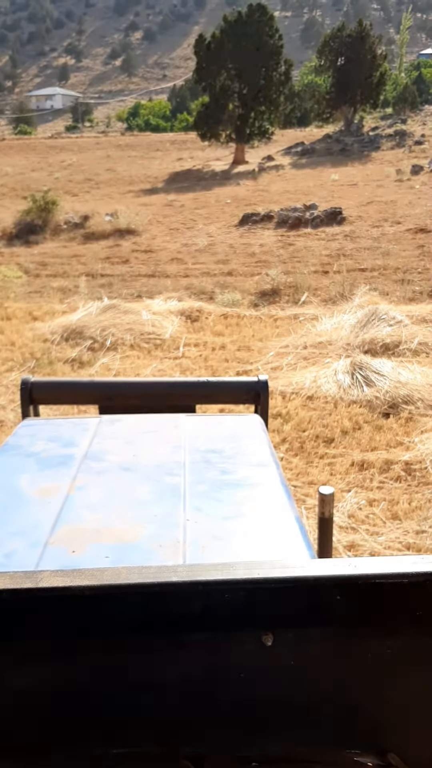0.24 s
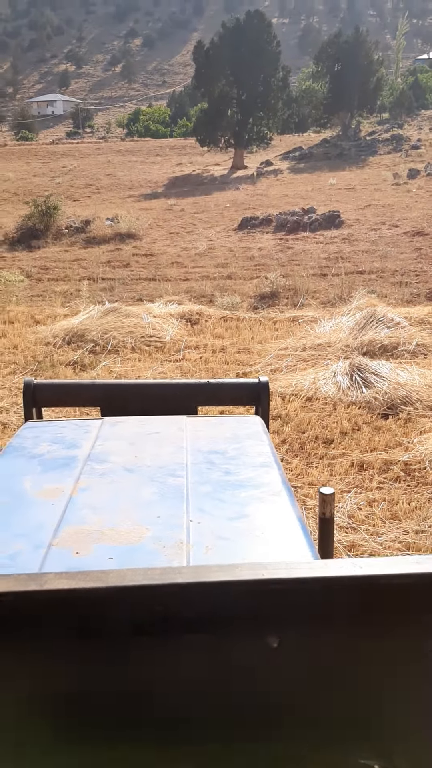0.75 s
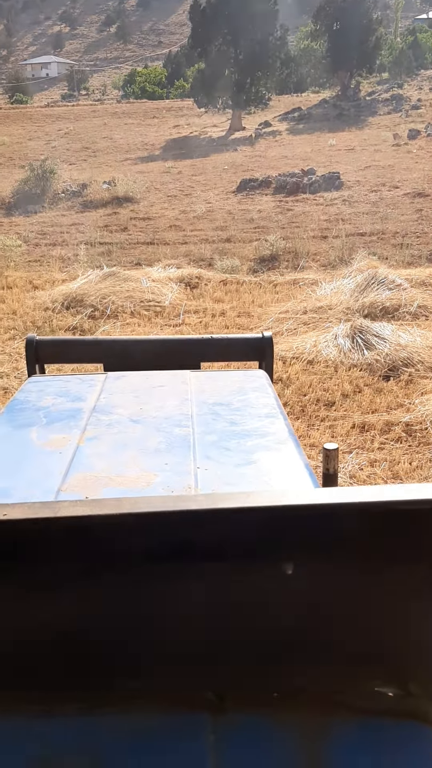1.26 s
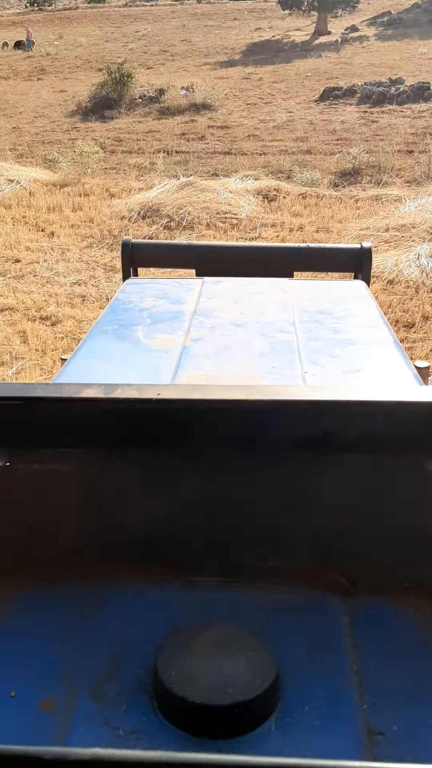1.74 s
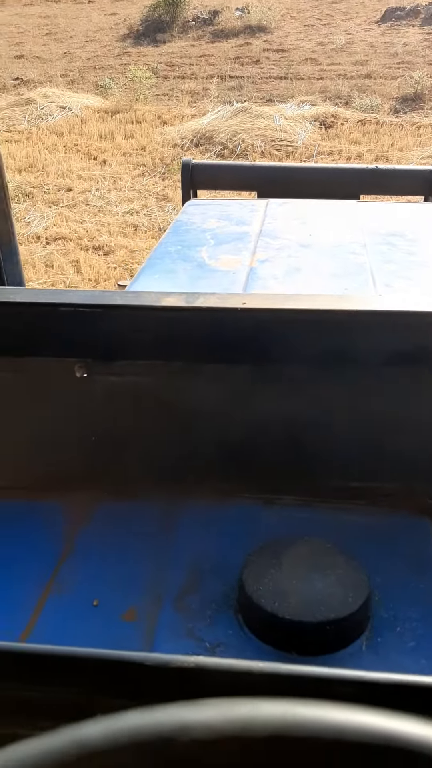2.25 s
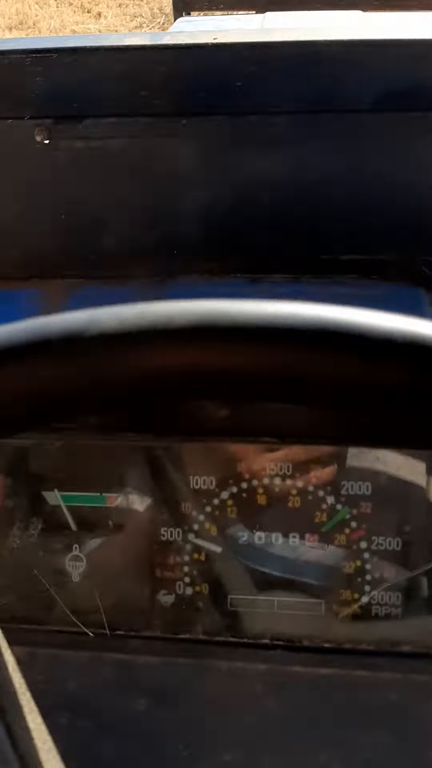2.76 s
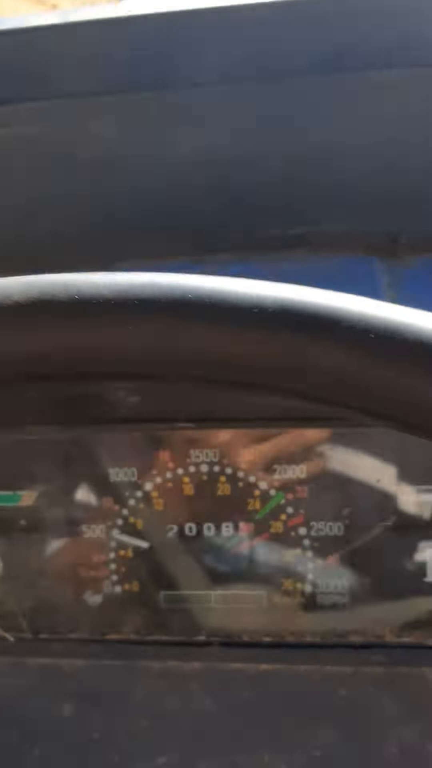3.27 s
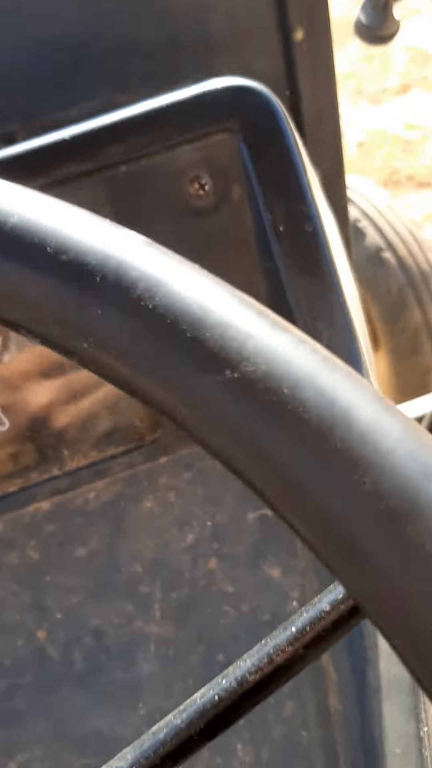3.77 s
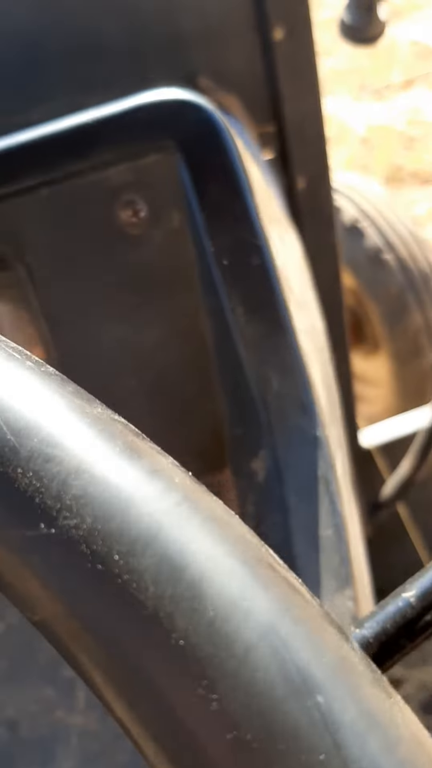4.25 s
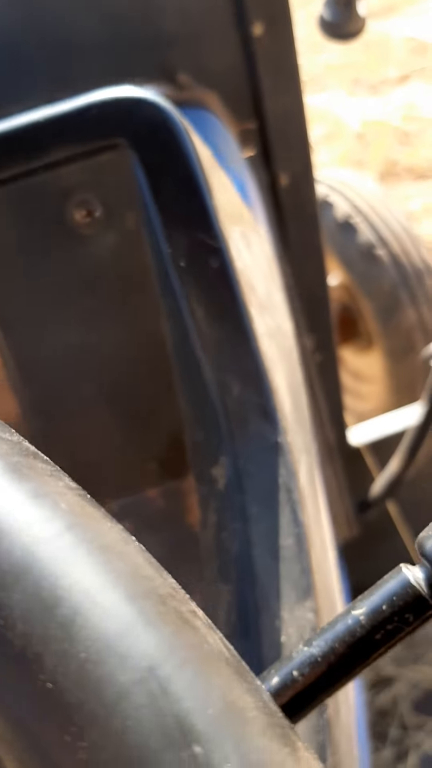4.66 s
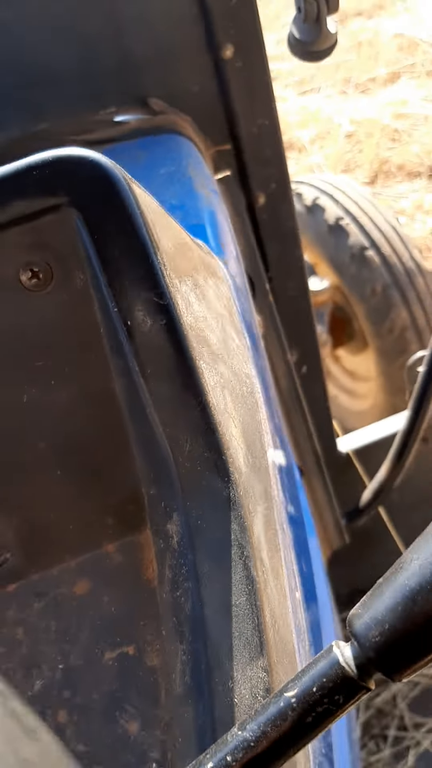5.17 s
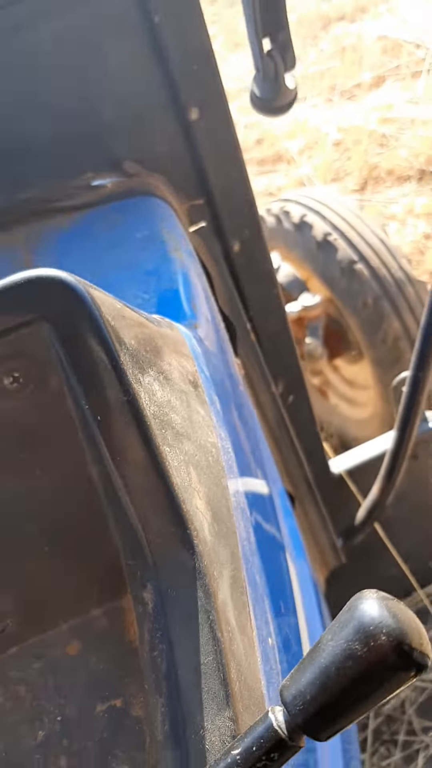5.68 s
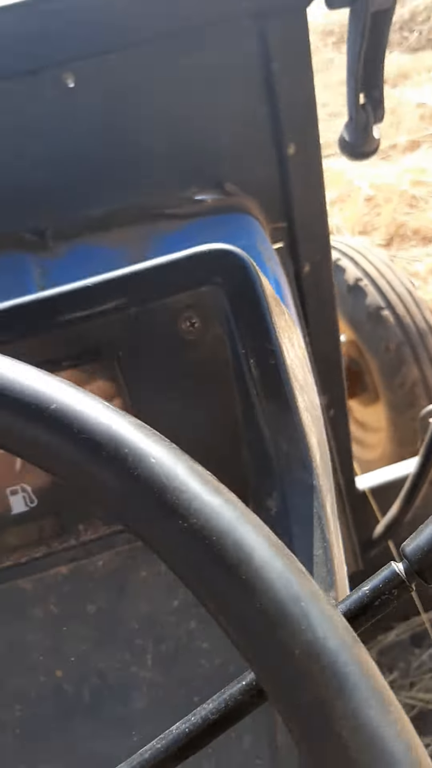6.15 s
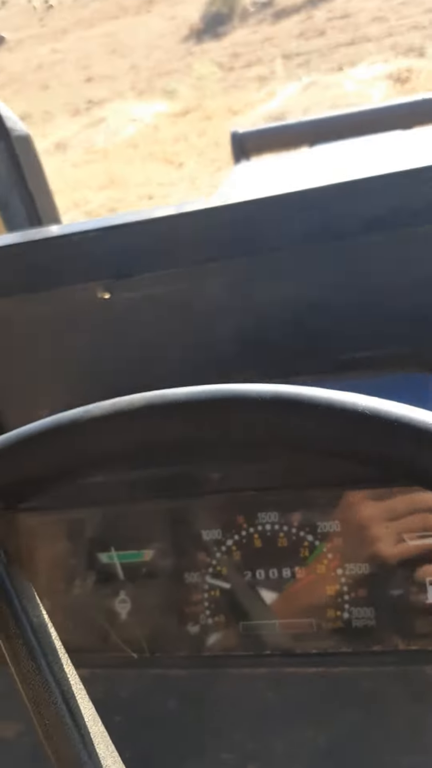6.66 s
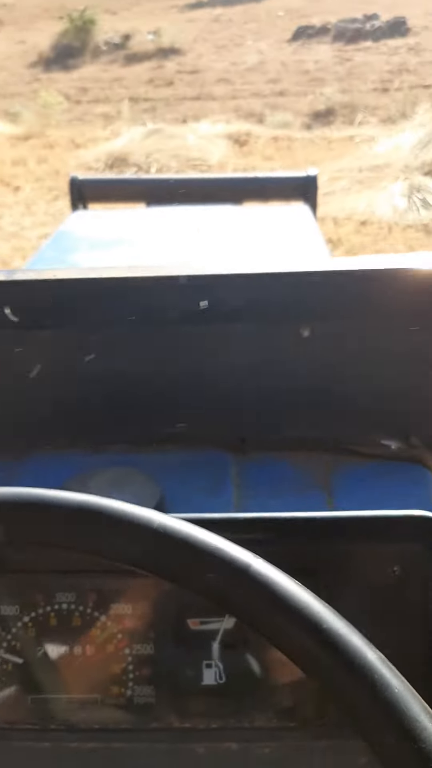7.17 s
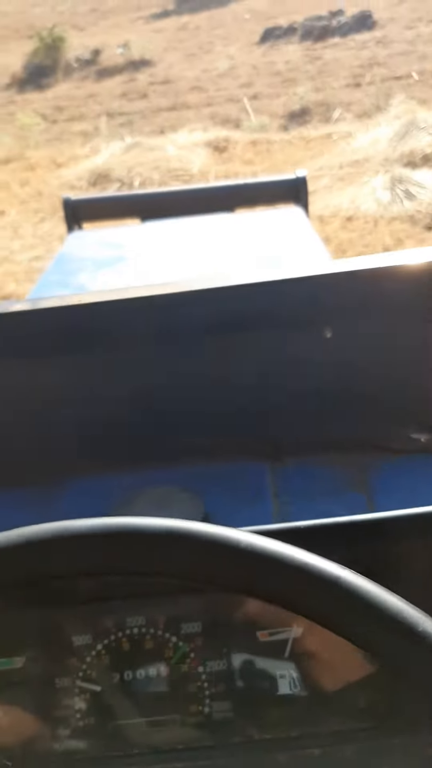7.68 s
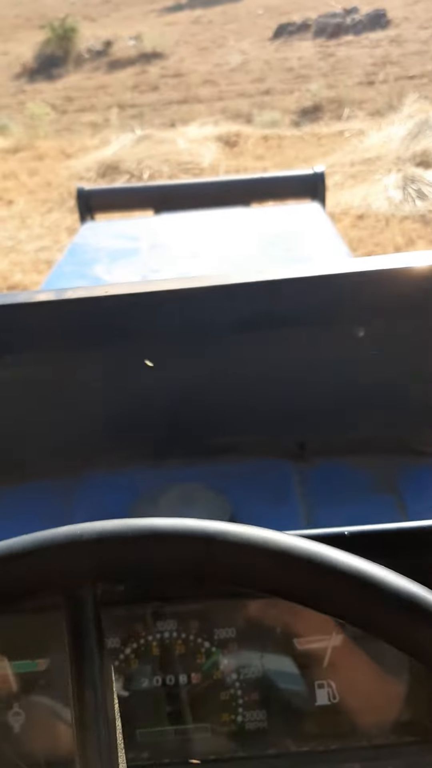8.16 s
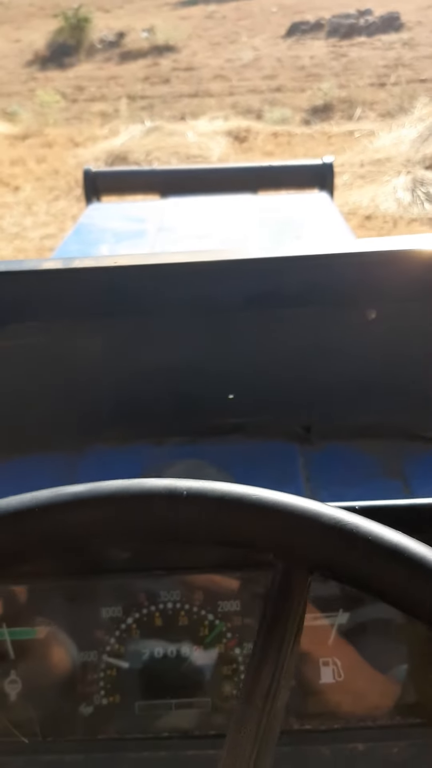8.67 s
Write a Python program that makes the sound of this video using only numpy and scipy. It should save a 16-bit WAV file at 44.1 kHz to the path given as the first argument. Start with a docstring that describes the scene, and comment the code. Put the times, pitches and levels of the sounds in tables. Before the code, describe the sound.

Heard from the seat of a farm tractor in an open field: near quiet with slight handling bumps, a key click, a sharp solenoid clack and a short grinding starter whirr. The diesel fires unevenly, races briefly, then settles to a slow, uneven knock with valve clatter, low exhaust puffs, sheet-metal drone and light wind buffeting a close handheld stereo microphone.

```python
"""A three-cylinder tractor diesel heard from the driver's seat in an open field: the key clicks, the starter
engages and cranks, the engine catches, races briefly and settles to a slow knocking idle. Each firing strikes
the ringing modes of the block; valves clack, loose parts tap and the exhaust pipe puffs. The starter is
throbbing gear noise; clicks are short bright bursts and bumps are ringing panels or low gust thumps. Flickering
noise makes the wind on a pair of microphone ports, the drone of the cab's sheet metal and the hiss."""
import sys
import numpy as np
from scipy import signal
from scipy.fft import rfft, irfft
from scipy.io import wavfile
from scipy.ndimage import uniform_filter1d

SR = 44100
rng = np.random.default_rng(int(sys.argv[2]) if len(sys.argv) > 2 else 0)


def store_pcm(level_fs):
    """Save levels as 16-bit WAV."""
    pcm = np.round(np.clip(level_fs, -1, 1) * 32767).astype(np.int16)
    wavfile.write(sys.argv[1], SR, np.atleast_2d(pcm).T)


N = 393372
T = np.arange(N) / SR  # seconds
HZ = np.fft.rfftfreq(N, 1 / SR)

# ringing modes of block and bonnet: f/Hz, width/Hz, then level/dB when struck by cylinder 1, 2, 3,
# by a valve, and in the steady running
BLOCK_MODES = [(372.5, 16.7, -6, 1.5, 7, 14.5, 9.5), (532, 57, -1, 0.5, -5.5, -1, -26),
               (664, 17.5, 3, 2.5, 0, -14, 8), (792, 6.1, -19, 5.5, -15, -23, -14),
               (903, 135, -0.5, -4, -18, -3, -20), (1156, 74, 6, -0.5, -3, -6, 4.5),
               (1310, 32.5, 9, 2.5, -10, 8, 8.5), (1531, 58, 6, 6.5, 7.5, 12, -7),
               (2027, 67, 7.5, 1.3, -7.5, -35, -2.5), (2194, 140, -0.5, -3.5, -11, -4, -29),
               (2598, 105, -6.5, -12.5, -6, 3.5, -31), (2793, 72, 0.5, 0, -25, -24, -31),
               (3100, 490, -4.5, -11, -16, -38, -12.5), (3514, 185, -4.5, -5.5, -20, -1.5, -29),
               (3860, 69, -12, -12, -13.5, -8, -17), (4774, 146, -7.5, -12.5, -11.5, -4, -17),
               (5600, 3000, -21, -27, -29.5, -13, -45)]
# slow changes of the surroundings: t/s, panel drone level/dB, wind buffet level/dB
SURROUNDINGS = [(0.0, -51, -39), (0.12, -47, -47), (0.57, -36.5, -29.5), (0.62, -18, -22.5),
                (0.69, -25, -26.5), (1.04, -29, -28), (1.22, -25, -28.5), (1.46, -33, -38.5),
                (3.8, -29, -32.5), (4.1, -25, -39), (4.3, -30, -37.5), (4.6, -28, -29.5), (5.99, -29, -33),
                (6.09, -31, -42.5), (7.13, -31, -30), (7.68, -29.5, -32), (7.85, -30, -35),
                (8.92, -34, -38.5)]
# slow changes of the engine: t/s, running noise level/dB, then gain/dB of the 2 kHz ring, of the band
# near 750 Hz, of the knocks near 1.1 kHz, of the block near 1.5 kHz
ENGINE_CHANGES = [(.57, -50, 0, 0, 0, 2), (.6, -31.5, 10, 12.5, 9, -4), (.85, -29.5, -8, -0.5, 5, -7),
                  (1.2, -32, -9, -5, -11, 5), (1.45, -31, 4.5, 0.5, -1, -6.5), (2, -37.5, 7.5, -3.5, 2, -1),
                  (3.4, -35.5, 6, -1, -14, -5), (3.6, -34.5, -1, 1.5, -2, -4), (4.3, -34.5, -7.5, 5, -2, 1),
                  (5.1, -36, -1, 9.5, 0, 3), (5.5, -34, 7.5, 7, 5, 2), (5.9, -35.5, -6.5, 8.5, 0, 3.5),
                  (6.3, -36, 3.5, 2.5, 2.5, -4), (6.7, -35, 6.5, -5, 8.5, -2),
                  (7.15, -32.5, 5.5, 2.5, 8, 3), (7.6, -33.5, 2, -4, 6, 2), (8.1, -34, 2, -1.5, -4, 1),
                  (8.92, -32, 1.5, -0.5, -6, -1.5)]
# fuel burnt per stroke, as strength of the knock: t/s, level/dB
FUEL_BURNT = [(.79, -28.5), (.87, -22.5), (.98, -32), (1.05, -24), (1.26, -19.5), (1.42, -29.5),
              (1.55, -27), (2.3, -27), (3.2, -22), (4.2, -23), (6, -24), (7.4, -22), (8.93, -20.5)]
RING_HZ = 1850, 2140  # band of the block's 2 kHz ring
FIRST_FIRING_S, FIRINGS_PER_TURN = 0.790, 3 / 2


def gain_of(db):
    """Turn decibels into a plain multiplier of the wave."""
    return 10 ** (np.asarray(db) / 20)


def evened(x):
    """Scale a sound to rms 1."""
    return x / np.sqrt(np.mean(x ** 2) + 1e-20)


def read(points, hz):
    """Read a table over frequency, with even steps in pitch."""
    f, value = np.transpose(points)
    return np.interp(np.log(hz + 1), np.log(f + 1), value)


def curve(rows, column):
    """Gain over time from a dB column, practically silent outside the table."""
    rows = np.array(rows)
    return gain_of(np.interp(T, rows[:, 0], rows[:, column], left=-120, right=-120))


def filtered(x, response):
    """Weigh the frequencies of a sound by a response."""
    return irfft(rfft(x) * response, N)


def band(lo_hz, hi_hz):
    """Response that passes one band and falls off steeply on both sides."""
    return 1 / (1 + (lo_hz / (HZ + 1)) ** 16) / (1 + (HZ / hi_hz) ** 16)


def noise(spectrum, flicker_db=0., flicker_s=0.015):
    """Coloured noise of rms 1 whose level flickers at random."""
    x, flicker = rng.standard_normal((2, N))
    width = int(flicker_s * SR)
    flicker = evened(uniform_filter1d(uniform_filter1d(flicker, width), width))
    coloured = filtered(x, gain_of(read(spectrum, HZ)))
    return evened(coloured * gain_of(flicker_db * flicker))


def blows(s, db):
    """A train of single-sample impulses at the given moments."""
    train, keep = np.zeros(N), s < T[-1]
    train[np.round(s[keep] * SR).astype(int)] = gain_of(db[keep])
    return train


def bursts(s, db, rise_s, t60):
    """Noise under a quick rise and a decay at each moment."""
    t = T[:8000]
    shape = (1 - np.exp(-t / rise_s)) * gain_of(-60 * t / t60)
    return signal.oaconvolve(blows(s, db), shape)[:N] * rng.standard_normal(N)


def modes(column):
    """Response of the block: resonances with steep skirts, struck as one column of the mode table says."""
    response = 0
    for k, row in enumerate(BLOCK_MODES):
        detune = 2j * (HZ - row[0]) / row[1]
        sign = (-1) ** k
        response = response + sign * gain_of(row[column]) / (1 + detune) / (1 + detune / 17.0)
    # white noise of rms 1 comes out with power 1 between 1.2 and 3.2 kHz
    middle = (HZ > 1200) & (HZ < 3200)
    return response / np.sqrt(np.sum(abs(response[middle]) ** 2) / len(HZ))


def strokes():
    """Count of firings so far, added up from the crankshaft speed."""
    # crankshaft speed: t/s, speed/turns per minute
    turning = [(0.79, 576.9), (0.93, 328.3), (1.05, 599.8), (1.2, 856.2), (1.33, 866.1), (1.55, 752.9),
               (1.85, 599.8), (2.05, 595.0), (2.24, 535.8), (2.38, 638.1), (2.5, 543.1), (3.2, 530.2),
               (3.5, 541), (3.75, 533.4), (4.0, 535), (4.2, 525), (4.45, 535.5), (5.5, 532.9), (7.0, 533.6),
               (8.0, 533), (8.4, 523.5), (8.92, 504.1)]
    count = np.cumsum(np.interp(T, *np.transpose(turning))) * FIRINGS_PER_TURN / 60 / SR
    return count - np.interp(FIRST_FIRING_S, T, count)


def throb(depth_db, late):
    """Gain that swells once per stroke, a share `late` after the firing; a negative depth sags there."""
    return gain_of(depth_db * np.cos(2 * np.pi * (strokes() - late)))


def panel_drone():
    """Low noise of the cab's sheet metal, swaying with the engine's strokes."""
    # colour of the drone: f/Hz, level/dB
    drone_colour = [(150, -35), (240, -9), (320, 0.5), (380, 0.5), (520, -2.5), (700, -9), (1000, -11),
                    (2000, -46)]
    sway = throb(depth_db=1.5, late=0.16)
    return curve(SURROUNDINGS, column=1) * sway * noise(drone_colour, flicker_db=3.5, flicker_s=.012)


def wind():
    """Wind buffeting the ports: deep noise that flickers."""
    # colour of the buffeting: f/Hz, level/dB
    buffet_colour = [(15, -28), (30, -12.5), (70, 1), (130, 0), (220, -3), (400, -7), (900, -37)]
    return curve(SURROUNDINGS, column=2) * noise(buffet_colour, flicker_db=4.5, flicker_s=0.013)


def treble_hiss():
    """Treble noise that swells and sinks."""
    # colour of the hiss: f/Hz, level/dB
    hiss_colour = [(3000, -9), (7000, -5.5), (10500, -5), (15000, 2.5)]
    # its swelling: t/s, level/dB
    hiss_swells = [(0.0, -35.5), (0.42, -47), (1.12, -37), (1.34, -36.5), (2.13, -42), (2.41, -31.5),
                   (3.48, -48.5), (4.12, -33.5), (4.65, -56), (4.89, -36), (5.04, -31), (5.24, -41.5),
                   (5.74, -36.5), (6.26, -43), (7.9, -45.5), (8.92, -37.5)]
    return curve(hiss_swells, column=1) * noise(hiss_colour, flicker_db=3.0)


def still_air():
    """Faint noise of the still air, with no slow changes of level."""
    # colour of the air: f/Hz, level/dB
    air_colour = [(500, -18), (1100, 9), (2500, -0.5), (7000, -6), (15000, -12)]
    return gain_of(-52.5) * noise(air_colour, flicker_db=5.5, flicker_s=0.028)


def bumps():
    """A panel or a gust swings up and rings for a few cycles at two close pitches."""
    # dull bumps of the cab's panels, and low thumps of wind gusts near 6.6 s and 7.3 s: t/s, level/dB, f/Hz,
    # time to fall by 60 dB/s
    dull_bumps = [(0.004, -23, 192, 0.042), (0.152, -27, 562, 0.016), (0.474, -18, 468, 0.03),
                  (0.498, -17.5, 398, 0.043), (0.526, -23, 354, 0.032), (0.549, -20, 315, 0.054),
                  (0.614, -12, 468.5, 0.15), (0.749, -14.5, 309, 0.12), (0.768, -14, 400, 0.038),
                  (0.901, -17.5, 262, 0.073), (1.486, -15.5, 345, 0.042), (1.899, -16, 400, 0.031),
                  (2.4, -21, 85.5, 0.067), (2.409, -22, 185, 0.047), (4.138, -10, 336, 0.037),
                  (6.563, -21, 72, 0.1), (7.03, -22, 446, 0.15), (7.283, -23, 75, .07),
                  (7.33, -21.5, 322, 0.068), (0.868, -18, 770, 0.027), (1.092, -21, 80, 0.068),
                  (1.126, -18.5, 150, .07), (1.146, -20, 95, .09), (1.165, -19, 322, 0.15),
                  (1.196, -17, 95.6, 0.13), (1.294, -23, 92, 0.15), (0.302, -26, 420, 0.038),
                  (7.089, -20.5, 118, 0.081), (7.147, -20, 264, 0.046), (7.636, -18.5, 223, 0.067),
                  (7.677, -18, 358, 0.044)]
    rise_cycles = 0.27
    out, t = np.zeros(N + 8000), T[:8000]
    for s, db, hz, t60 in dull_bumps:
        ring = np.sin(2 * np.pi * hz * t) + 0.29 * np.sin(2 * np.pi * 1.4 * hz * t)
        shape = (1 - np.exp(-t * hz / rise_cycles)) ** 2 * gain_of(-60 * t / t60)
        out[round(s * SR):][:8000] += gain_of(db) * ring * shape / shape.max()
    return out[:N]


def clicks():
    """Short bright bursts around a centre, over a weak broad crack; the narrowest ring like struck metal."""
    # key, solenoid, pinion, loud valve ticks while cranking, first hard firings, loose parts: t/s, level/dB,
    # centre f/Hz, spread/octaves, time to fall by 60 dB/s
    metal_clicks = [(0.293, -9, 10100, 2.1, 0.052), (0.569, -15, 11200, 1.8, 0.075),
                    (0.59, -5.5, 3280, 1.4, 0.087), (0.872, -10, 2600, 0.37, 0.057),
                    (0.89, -10.5, 1500, .1, .09), (0.946, -12, 2640, .08, 0.044),
                    (0.99, -16, 3860, .2, .08), (1.048, -7, 1530, 0.089, 0.075),
                    (1.054, -12, 2690, 0.092, 0.043), (1.111, -5, 1600, 0.17, 0.088),
                    (0.9446, -8, 4550, 0.18, 0.053), (1.0236, -7, 4960, 0.13, 0.032),
                    (1.0909, -6, 4700, 0.32, 0.042), (1.147, -9, 5030, 0.33, 0.05),
                    (1.1964, -9.5, 5600, 0.55, 0.085), (1.146, -10, 2820, .12, .05),
                    (1.212, -7, 1515, 0.09, .07), (1.26, -11.5, 4000, 0.63, 0.077),
                    (2.278, -19, 5300, 0.52, 0.058), (2.7744, -21.5, 11000, 0.7, 0.048),
                    (3.2154, -17, 5200, 0.34, 0.037), (4.022, -16.5, 4950, 0.52, 0.13),
                    (6.3824, -9, 3700, 0.26, 0.03), (6.797, -22, 12000, .8, 0.038)]
    crest_db = 6.5  # allowance for the peaks of noise above its rms
    rise_share = 0.025  # rise time as share of t60
    ringing_octaves = 0.17  # clicks narrower than this ring mostly at one pitch
    out = np.zeros(N + 4000)
    t, hz = T[:4000], np.fft.rfftfreq(4000, 1 / SR) + 1
    grains = rng.standard_normal((len(metal_clicks), 4000))
    for (s, db, centre_hz, spread, t60), grain in zip(metal_clicks, grains):
        octaves_off = np.log2(hz / centre_hz)
        colour = 0.042 + 1 / (1 + (octaves_off / (1.94 * spread)) ** 2) ** 2
        colour = colour / (1 + (900 / hz) ** 2)  # little bass
        ringing = 1 / (1 + (spread / ringing_octaves) ** 4)
        ring = evened(np.sin(2 * np.pi * centre_hz * t + grain[0]))  # random starting phase
        crack = evened(irfft(rfft(grain) * colour))
        click = evened(ringing * ring + np.sqrt(1 - ringing ** 2) * crack)
        shape = (1 - np.exp(-t / (rise_share * t60))) ** 2 * gain_of(-60 * t / t60)
        out[round(s * SR):][:4000] += gain_of(db - crest_db) * click * shape
    return out[:N]


def running_noise():
    """Steady gear and fan noise between the modes, plus noise ringing the block, throbbing with the strokes."""
    # colour of the gears and fan: f/Hz, level/dB
    gear_fan_colour = [(410, -42), (700, -13), (1540, 2), (1770, -0.5), (2080, -13.5), (2370, -8.5),
                       (7500, -18), (9000, -27), (11700, -84), (19800, -120)]
    gears = gain_of(-2.0) * noise(gear_fan_colour, flicker_db=4.5)
    block = gain_of(-2.5) * evened(filtered(rng.standard_normal(N), modes(column=6)))
    return (gears + block) * curve(ENGINE_CHANGES, column=1) * throb(depth_db=2.2, late=0.35)


def starter():
    """Gear noise that throbs as each cylinder passes its compression, and rings the block."""
    # colour of the whirr: f/Hz, level/dB
    whirr_colour = [(500, -21), (1000, -3), (1500, -11), (2300, -1), (3100, -4), (3700, -2), (5500, -13),
                    (8000, -12), (16000, -19.5)]
    on_s, off_s, edge_s = 0.582, 1.31, 0.018  # engages, drops out, length of both fades
    start_db, rise_db_per_s, top_db = -35.5, 24, -25  # louder as it spins up
    engage_db, engage_s = 25.5, 0.035  # extra grind while the pinion meshes, and how fast it dies away
    grind = noise(whirr_colour, flicker_db=4.0, flicker_s=0.013)
    struck = filtered(rng.standard_normal(N), modes(column=5) * band(1000, 9000))
    grind += gain_of(-6.5) * evened(struck)
    since = np.maximum(T - on_s, 0)
    db = np.minimum(start_db + rise_db_per_s * since, top_db)
    db = db + engage_db * np.exp(-since / engage_s)
    engaged = np.clip(np.minimum(since, off_s + edge_s - T) / edge_s, 0, 1)
    return gain_of(db) * engaged * throb(depth_db=-0.5, late=0.25) * grind


def firings():
    """Moment, knock dB and gap to the next of every firing, cylinders in turn, slightly uneven."""
    # cylinders 1, 2, 3: knock against the fuel level/dB, lateness/share of the way to the next firing
    cylinder_habits = [(0.5, 0.000083), (-1, 0.01524), (-3, -0.005)]
    scatter_db, jitter_s = 1.5, 0.0006
    count = strokes()
    number = np.arange(int(count[-1]) + 1)
    db, late = np.array(cylinder_habits)[number % len(cylinder_habits)].T
    scatter, jitter = rng.standard_normal((len(number), 2)).T
    s = np.interp(number + late, count, T)
    db = db + np.interp(s, *np.transpose(FUEL_BURNT)) + scatter_db * scatter
    return s + jitter_s * jitter, db, np.diff(s, append=2 * s[-1] - s[-2])


def knocks(k, at, level):
    """Burning fuel strikes the block: two pressure steps, burning noise, rattle and the bonnet's answer."""
    # cylinder 2's 2 kHz ring grows as the listener turns to the side, fades as he faces the bonnet: t/s, gain/dB
    turned_ring = [(0, 1), (3.5, -0.5), (4.5, 7), (5.3, 5), (6.2, 1), (6.7, -8), (8.93, -11)]
    step_db, second_db = 14, -3.5  # step against the knock level, second step against the first
    # the charge lights in two steps; the wait for the second varies
    first = at + 0.002483
    second = first + 0.003505 + 0.005015 * rng.random(len(at))
    steps = blows(first, level + step_db) + blows(second, level + step_db + second_db)
    knock = filtered(steps, band(270, 3730))
    knock += bursts(at, level + 5.5, rise_s=0.0033, t60=0.062)  # uneven burning
    knock += bursts(at, level - 8, rise_s=0.00035, t60=0.16)  # rattle that follows
    knock += filtered(blows(at + 0.014, level + 19), band(1430, 1640))  # the bonnet answers a moment later
    knock = filtered(knock, modes(column=2 + k))
    if k == 1:
        knock += filtered(knock, band(*RING_HZ)) * (curve(turned_ring, column=1) - 1)
    return knock


def valve_clacks(k, at, level, gap):
    """A valve seats after each firing: a noise burst that rings the block."""
    # for each cylinder: delay/share of the way to the next firing, level against its average knock/dB
    valve_seating = [(0.63, -9.5), (0.64, -3), (0.566, -9)]
    delay, db = valve_seating[k]
    scatter = 2.0 * rng.standard_normal(len(at))
    clack = bursts(at + delay * gap, level.mean() + db + scatter, rise_s=0.0014, t60=0.076)
    return filtered(clack, modes(column=5))


def exhaust_puffs(at, level, gap):
    """Each puff of exhaust makes the pipe ring at its own pitch; more fuel puffs harder."""
    # for each cylinder: delay/share of the way to the next firing, level at idle fuel/dB
    puff_timing = [(0.754, -32), (0.852, -28.5), (0.904, -40)]
    pipe_hz, t60 = 79, 0.13
    puff_per_fuel, idle_fuel_db = 1.48, -25  # dB of puff per dB of knock above the idle
    train = np.zeros(N)
    for k, (delay, db) in enumerate(puff_timing):
        puff_db = db + puff_per_fuel * (level[k::3] - idle_fuel_db)
        train += blows(at[k::3] + delay * gap[k::3], puff_db)
    t = T[:8000]
    puff = -np.sin(2 * np.pi * pipe_hz * t) * (1 - np.exp(-t / 0.0031)) * gain_of(-60 * t / t60)
    return signal.oaconvolve(train, puff)[:N]


def clatter():
    """Loose tappets and linkage: scattered taps, each ringing a single upper mode of the block."""
    taps_per_s, level_db, scatter_db = 130, -16, 3
    # taps are thickest just after a firing
    taps = rng.random(N) < taps_per_s / SR * throb(depth_db=4, late=0.25)
    scatter = gain_of(scatter_db * np.minimum(rng.exponential(1, N), 4))
    size = taps * scatter * curve(FUEL_BURNT, column=1)
    upper = [row for row in BLOCK_MODES if 1000 < row[0] < 5000 and row[1] < 200]
    struck, out = rng.integers(0, len(upper), N), np.zeros(N)
    for k, (hz, width, *_) in enumerate(upper):
        # a two-pole resonator; r sets how long it rings, turn sets its pitch
        r, turn = np.exp(-np.pi * max(width, 50) / SR), 2 * np.pi * hz / SR
        ring = signal.lfilter([np.sin(turn)], [1, -2 * r * np.cos(turn), r * r], size * (struck == k))
        out += gain_of(level_db - 7.5 * np.log2(hz / 2000)) * ring  # higher modes weaker
    return out


def engine(s, db, gap):
    """Knocks, valves, clatter and running noise, with bands that swell and sink over time."""
    out = np.zeros(N)
    for k in range(3):
        at, level = s[k::3], db[k::3]
        out += knocks(k, at, level)
        out += valve_clacks(k, at, level, gap[k::3])
    out += filtered(out, band(910, 1170)) * (curve(ENGINE_CHANGES, column=4) - 1)
    out += clatter() + running_noise()
    out += filtered(out, band(*RING_HZ)) * (curve(ENGINE_CHANGES, column=2) - 1)
    out += filtered(out, band(510, 926)) * (curve(ENGINE_CHANGES, column=3) - 1)
    out += filtered(out, band(1390, 1650)) * (curve(ENGINE_CHANGES, column=5) - 1)
    return out


def field(fired):
    """All sources at one point; returns the noisy part and the part that both ports share."""
    noisy = panel_drone() + wind() + treble_hiss() + still_air()
    noisy += clicks() + starter() + engine(*fired)
    return noisy, bumps() + exhaust_puffs(*fired)


def scene():
    """The right port hears partly the left's sound, later, and partly other paths."""
    # how far the left port leads: f/Hz, lead/radians
    port_lead = [(0, 0), (600, -0.5), (1290, -3.3), (1810, -1.9), (2070, -0.1), (5170, 9.7), (8180, 16.6),
                 (10900, 25.2), (14000, 29.1), (16500, 39.7)]
    # how alike the ports hear: f/Hz, likeness/0-1
    port_likeness = [(60, 0), (150, .1), (300, .44), (600, .33), (1200, .55), (3000, .47), (12000, .3)]
    # left port against right, for equal sound: f/Hz, level/dB
    port_balance = [(60, 5.0), (180, 2.5), (550, -1.5), (1650, -1.0), (4970, -0.5), (15000, 0.5)]
    fired = firings()
    near, shared = field(fired)
    other, _ = field(fired)  # same firings, fresh noise
    alike = np.clip(read(port_likeness, HZ), 0, 1)
    lag = np.exp(-1j * np.interp(HZ, *np.transpose(port_lead)))
    tilt = gain_of(read(port_balance, HZ) / 2)
    left = filtered(near + shared, tilt)
    right = filtered(near, alike * lag / tilt)
    right += filtered(other, np.sqrt(1 - alike ** 2) / tilt)
    right += filtered(shared, 1 / tilt)
    return np.array([left, right])


def record(dry):
    """Microphone gain, the dip of its housing, then the band limit."""
    gain_db, edge_hz = 1.5, 15800
    notch_hz, notch_width_hz, notch_db = 8810, 710, -18
    dip = gain_of(gain_db + notch_db / (1 + (2 * (HZ - notch_hz) / notch_width_hz) ** 2))
    coloured = np.array([filtered(channel, dip) for channel in dry])
    low_pass = signal.firwin(511, edge_hz, window=("kaiser", 9), fs=SR)
    return signal.oaconvolve(coloured, low_pass[None], "same")


dry = scene()
out = record(dry)
store_pcm(out)
```